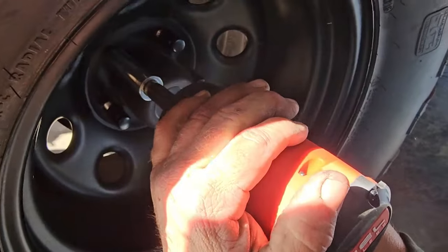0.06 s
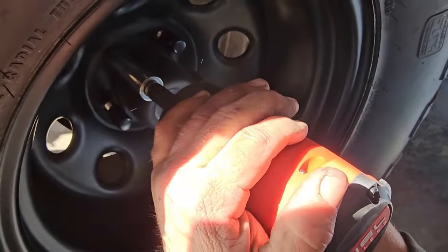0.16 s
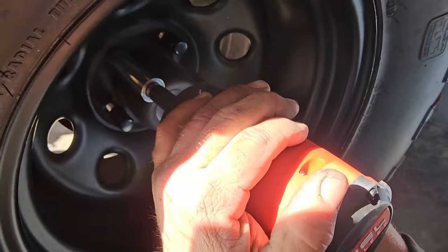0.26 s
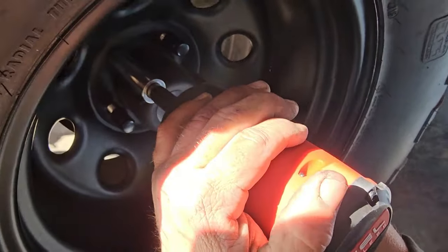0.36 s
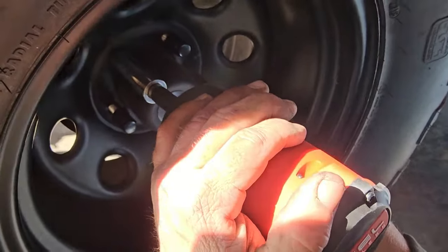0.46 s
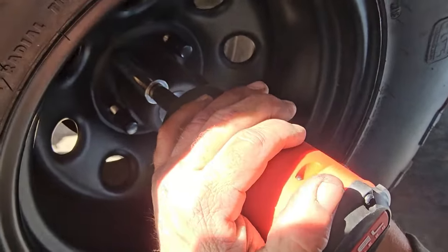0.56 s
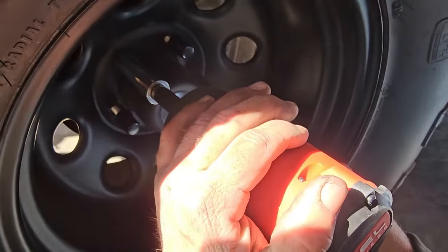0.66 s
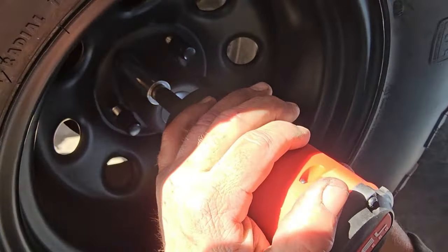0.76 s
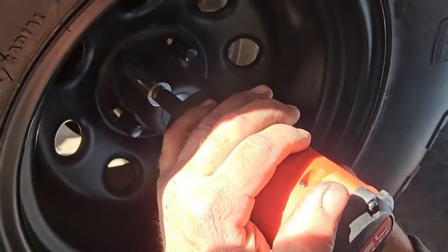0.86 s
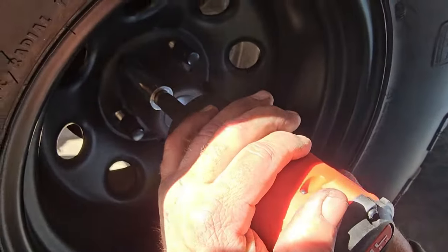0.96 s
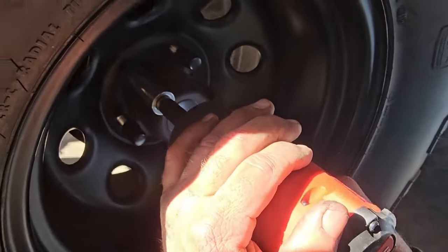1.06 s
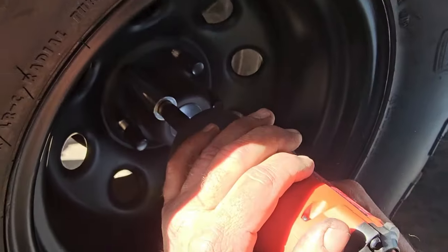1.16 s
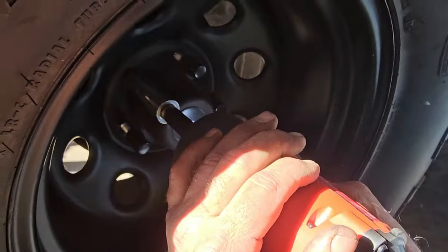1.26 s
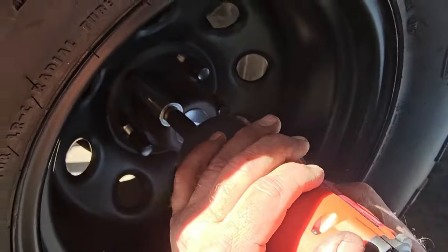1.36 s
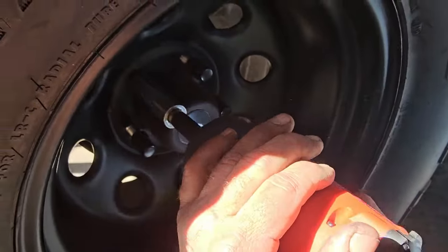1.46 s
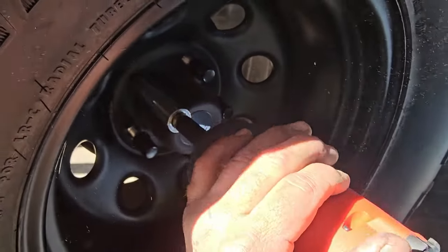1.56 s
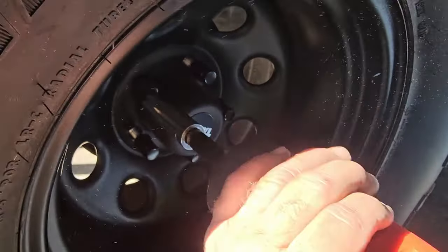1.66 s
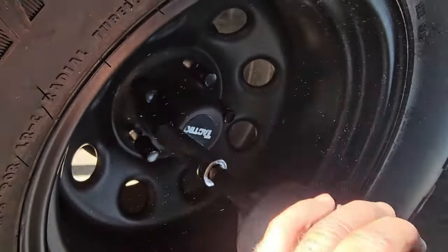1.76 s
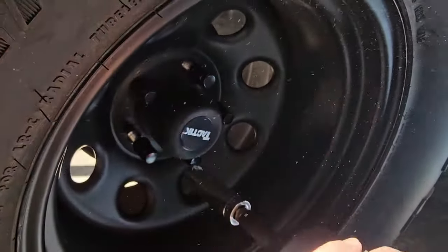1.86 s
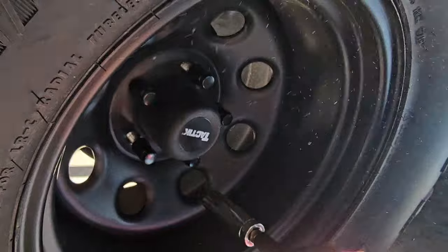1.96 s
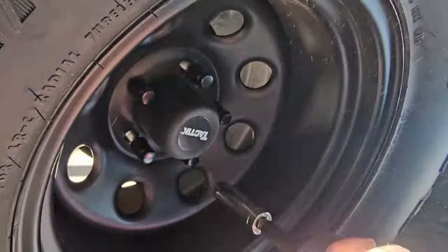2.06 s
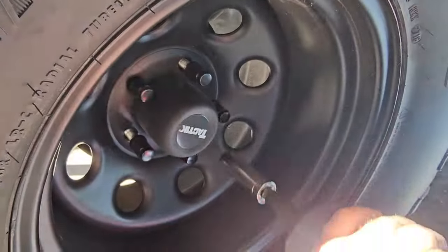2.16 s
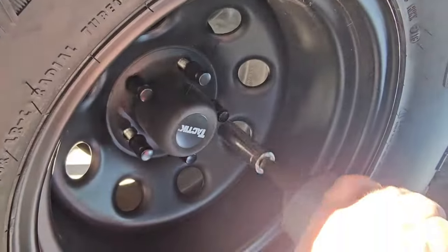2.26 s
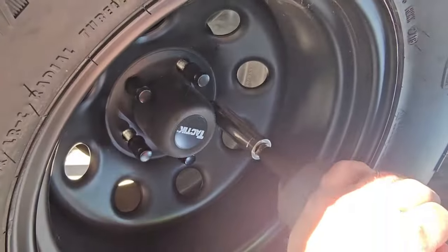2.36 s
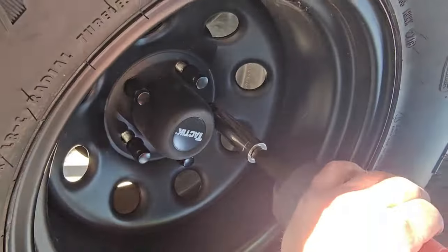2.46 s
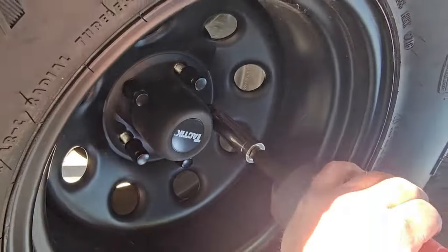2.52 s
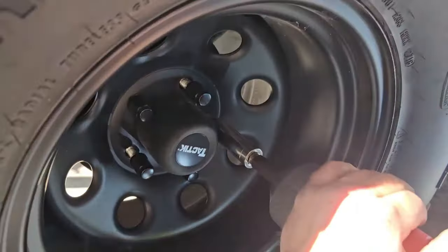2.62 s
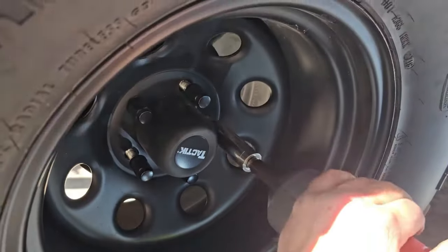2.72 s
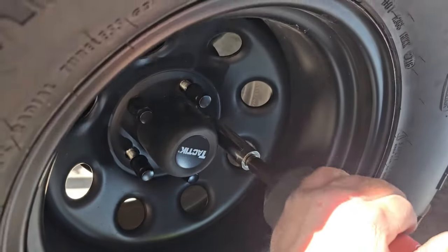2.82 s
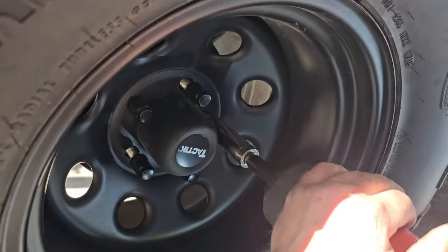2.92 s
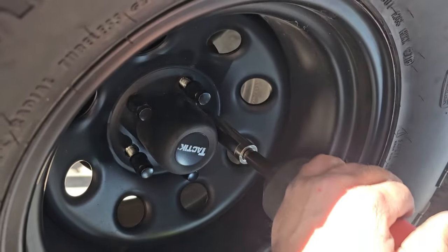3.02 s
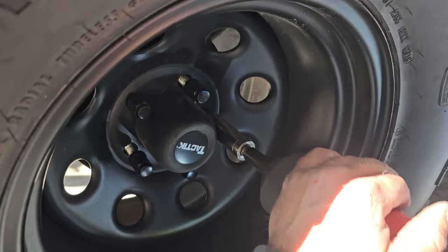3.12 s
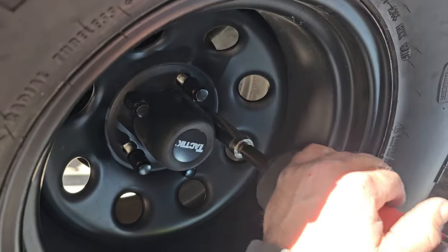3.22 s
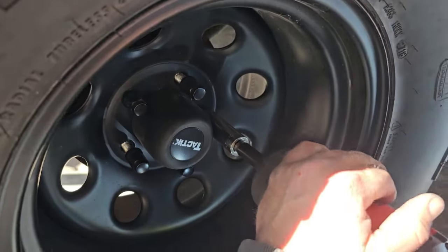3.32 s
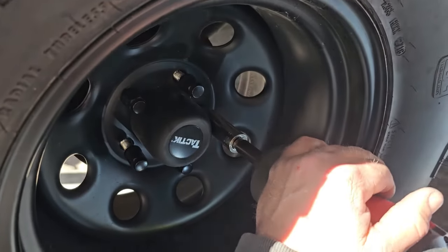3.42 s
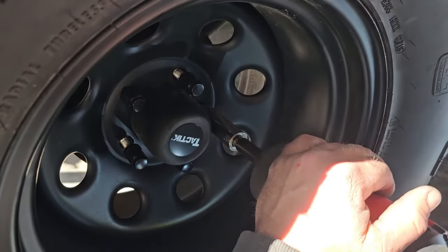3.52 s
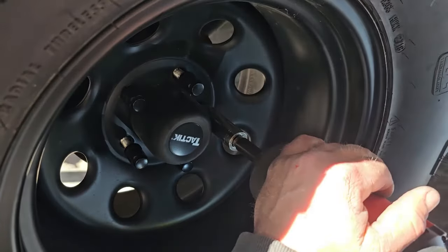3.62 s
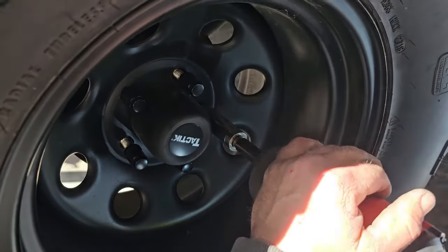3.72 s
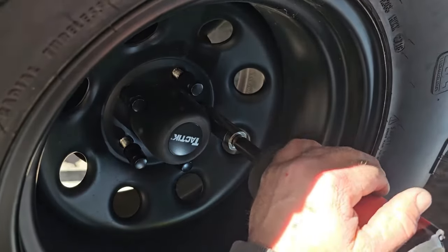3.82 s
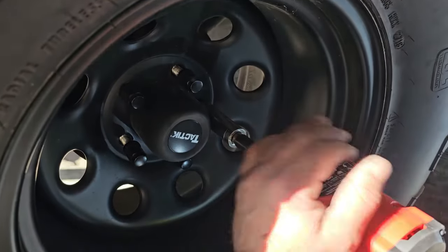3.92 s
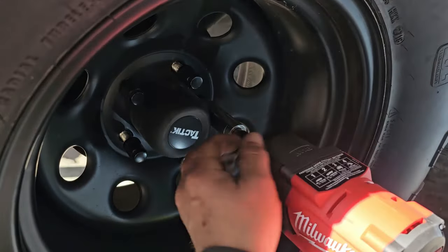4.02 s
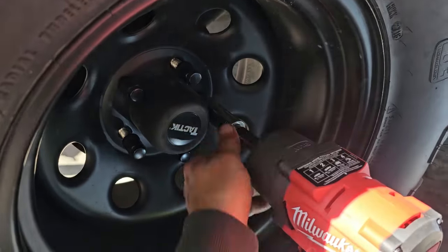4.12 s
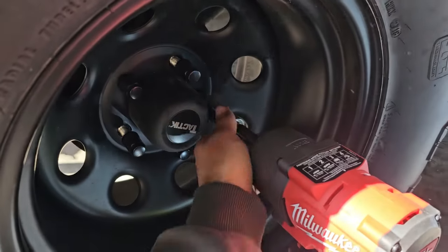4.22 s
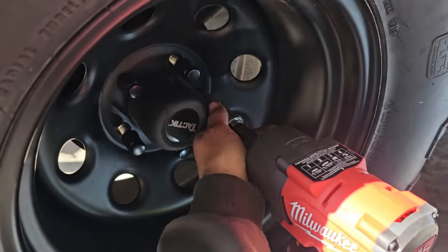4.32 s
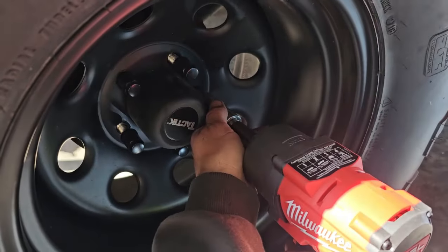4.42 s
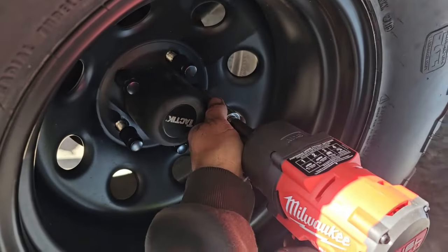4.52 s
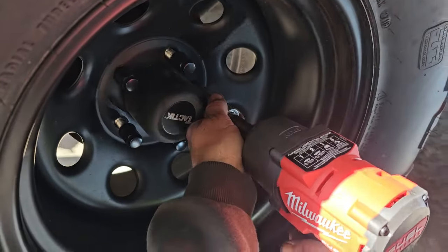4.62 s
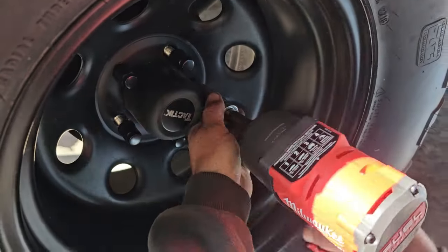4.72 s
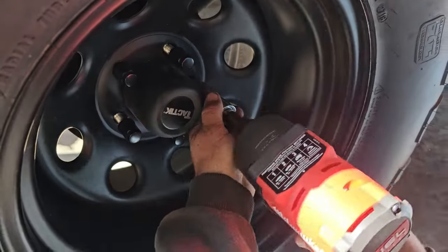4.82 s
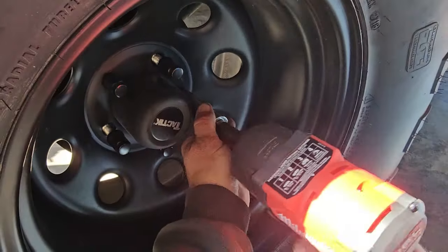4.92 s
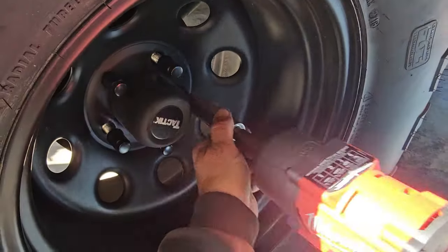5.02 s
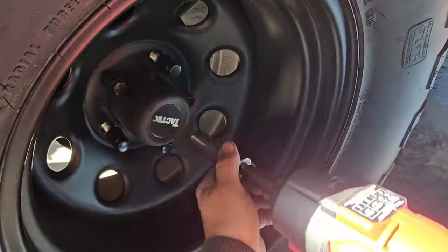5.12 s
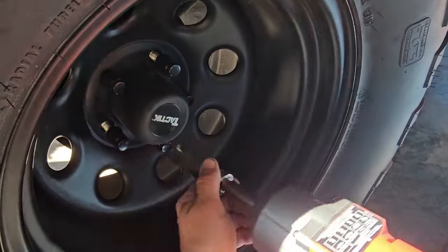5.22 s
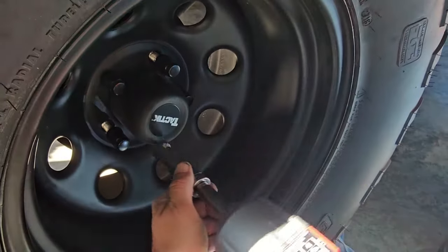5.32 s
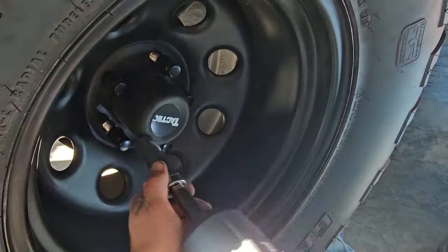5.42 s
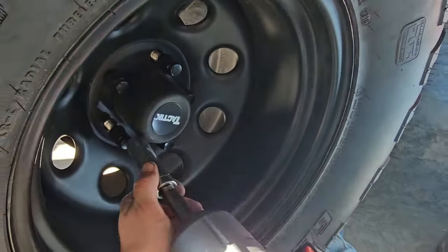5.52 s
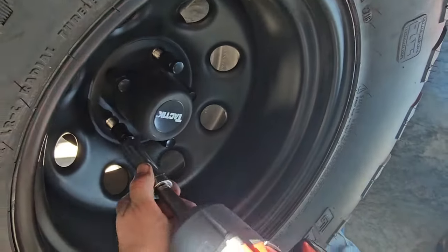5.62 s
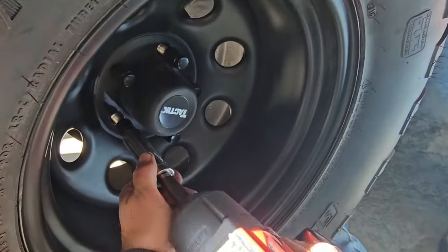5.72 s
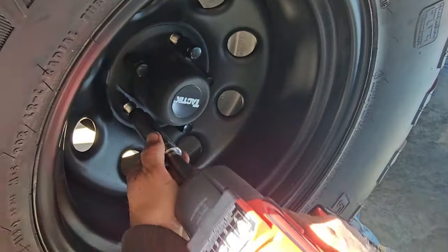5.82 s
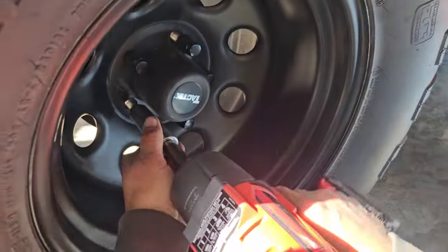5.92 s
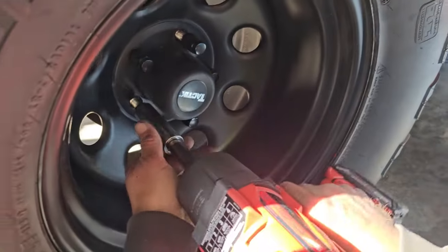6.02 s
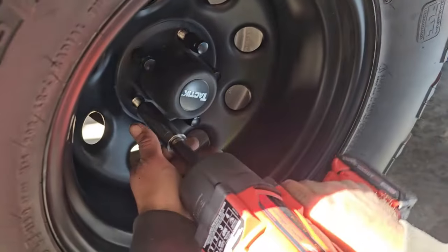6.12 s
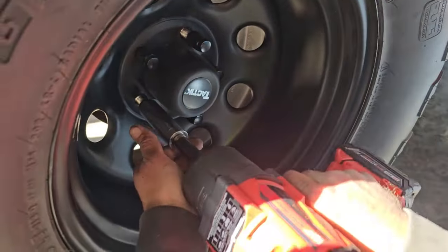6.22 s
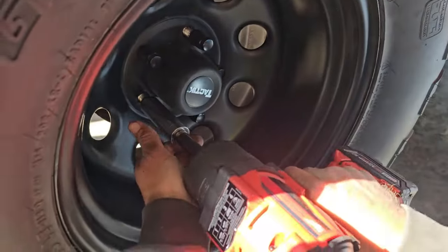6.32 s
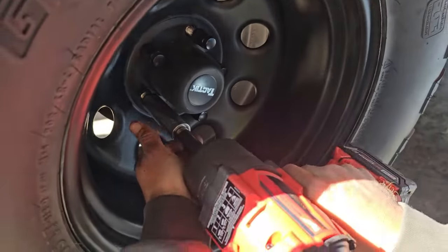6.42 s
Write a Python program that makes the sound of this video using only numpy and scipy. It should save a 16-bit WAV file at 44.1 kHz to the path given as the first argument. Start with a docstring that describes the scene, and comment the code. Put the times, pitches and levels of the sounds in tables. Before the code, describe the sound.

A cordless impact wrench whines, then hammers a wheel nut tight in rapid metallic cracks; socket knocks and more short bursts follow outdoors.

```python
"""A motor whine over gritty gear chatter comes first: an impact wrench, close by, running lug nuts onto a wheel.
The whine, gear tones and drive switching are sines tied to one motor speed; the chatter is banded noise.
Paired hammer blows crack and clang as nuts seat; light ticks sound while the motor spins and as it coasts down.
Between pulls the socket knocks on nut and wheel and sings as beating sines; contacts are noise and wheel modes.
Behind lie scattered yard returns, low outdoor rumble and faint hiss, all made of noise."""
import sys
import numpy as np
from scipy import signal
from scipy.io import wavfile
from scipy.ndimage import uniform_filter1d

SR = 44100
rng = np.random.default_rng(int(sys.argv[2]) if len(sys.argv) > 2 else 0)


def file_out(sig):
    """Save sig as 16-bit WAV at sys.argv[1]."""
    # one column per channel
    cols = np.atleast_2d(sig).T
    # limit, then scale
    lim = np.clip(cols, -1, 1)
    pcm = np.round(lim * 32767).astype(np.int16)
    wavfile.write(sys.argv[1], SR, pcm)


N = 285327

# Motor from trigger to rest, one table a pull: t/s, whine f/Hz, whine level/dB
MOTOR_SPEEDS = [
    [(0, 3665, -36), (.1, 3310, -30), (.5, 3250, -30), (.85, 3045, -31), (1.0, 2980, -23),
     (1.19, 2858, -20), (1.225, 2800, -24), (1.26, 2510, -30), (1.43, 2400, -30), (1.5, 1000, -30),
     (1.66, 500, -30)],
    [(2.8, 390, -70), (2.86, 2100, -45), (2.9, 3150, -27), (2.95, 4000, -22), (3.0, 4240, -22),
     (3.09, 4348, -20), (3.21, 4333, -22), (3.275, 3970, -24), (3.31, 3295, -34), (3.4, 2800, -34),
     (3.48, 1500, -34), (3.63, 600, -34)],
    [(3.645, 294, -70), (3.68, 2170, -55), (3.89, 3000, -55), (3.92, 1500, -55)],
    [(6.135, 400, -70), (6.17, 1900, -50), (6.2, 2550, -28), (6.24, 3250, -22), (6.28, 3950, -25),
     (6.33, 4230, -25), (6.4, 4320, -25), (6.47, 4300, -26)],
]
# One row a pull: nut seats t/s, gear noise level/dB, mid left-right/dB, treble left-right/dB,
# extra brightness/dB, nose-cone level/dB, rumble level/dB, gear-tone level/dB, switching level/dB,
# starting wobble/%. Source levels are those at full speed.
PULLS = [(1.235, -18.5, -1.5, 9, -4, -28.5, -37.5, -29, -29, 3.5),
         (3.3, -21, -4, 8, 0, -32, -33, -65, -70, 0),
         (3.68, -23, -1.5, 8.3, -5, -35.5, -37.5, -65, -54.5, 1.5),
         (6.47, -18.5, -3.5, 7.6, -13, -23, -34, -53, -69, .5)]
# Whine and its overtones: multiple of the whine, level/dB
WHINE_TONES = [(1, 0), (2, -10), (3, -18)]
# Gear tones: sevenths of the whine, level/dB
GEAR_TONES = [(1, -7), (2, -6), (3, -10), (4, 1), (5, 4), (6, -1), (8, -7), (9, -8), (10, -6)]
# Drive switching: multiple of the switching rate, eighths of the whine added, level/dB
SWITCHING_TONES = [(1, -2, -25), (1, -1, 6), (1, 0, -4.5), (1, 1, 0.5), (1, 2, -28), (2, -1, -9.5),
                   (2, 0, -18.5)]
SWITCH_HZ, FULL_SPEED_HZ = 7728, 4350   # full speed is given as whine frequency
DB_PER_OCTAVE = 7.5   # the tool gets louder with speed
OVERTONE_LOSS_DB = 55   # times the shortfall from full speed, as a fraction
NUT_TURN_S, FASTEST_S = .1095, .135   # one turn of the nut; a moment of least drag
TONES_FADE_S = .02   # hammering breaks up the tones once the nut seats
START_SWITCH_DB, START_FALL_DB_PER_S = -58, 60   # extra switching as the motor starts
# binding eases as the nut runs down, and shakes the tool (dB per % of wobble)
WOBBLE_RISE_S, WOBBLE_FADE_S, RUMBLE_DB_PER_WOBBLE = .1, .8, 3.5

# Gear noise colour: f/Hz, level/dB per Hz
GEAR_COLOUR = [(290, -43), (500, -14), (919, -12.5), (1160, -17), (1300, -13.5), (1510, -8), (2190, -4.5),
               (3700, -7), (4340, 3.5), (5630, -12.5), (7530, -14.5), (9090, -16), (14000, -25),
               (15100, -34), (16000, -28.5)]
# Housing resonances: f/Hz, width/Hz, level/dB against the gear noise
HOUSING = [(2260, 60, -14), (4740, 320, -6.5), (5320, 41, -15), (7060, 330, -7.5)]
# Nose-cone resonance: f/Hz, width/Hz
NOSE_CONE = (3040, 130)
NOSE_FOLLOWS = 0.48   # exponent: how far the nose cone follows loudness before the nut seats

# Hammer pairs: dull blow t/s, dull peak level/dB, gap/ms, bright peak level/dB
HAMMER_PAIRS = [(1.2373, -8, 10, -17), (1.2479, -8, 9.2, -7), (1.2597, -31, 11.7, -9.5),
                (1.299, -10, 6.7, -7), (1.3047, -12, 10.8, -8), (1.3419, -8, 8.8, -6),
                (1.3782, -6, 12.4, -10.5), (1.4142, -4.5, 9.8, -7.5), (1.463, -21, 16, -8),
                (3.302, -28, 8.7, -7.5), (3.3444, -19, 8.9, -7.5), (3.3875, -16, 7.6, -5.5),
                (3.4463, -27, 16.5, -14), (3.666, -44.5, 11.1, -14.5), (3.7021, -17.5, 20.4, -7.5),
                (3.7516, -8.5, 11.6, -7.5), (3.79, -10, 9.5, -7.5), (3.827, -11.5, 10.2, -8.5),
                (3.865, -12, 11.6, -8), (3.887, -37, 10, -13.5), (6.164, -41, 10, -8.5)]
# Tick runs: first t/s, last t/s, first gap/ms, gap growth/ms, first peak level/dB, loss a tick/dB
TICK_RUNS = [(0.2854, .29, 22, 0, -5.5, -0.5), (1.512, 1.64, 23.5, 0.98, -11, 2),
             (2.828, 2.83, 24, 0, -13.5, 0), (3.0176, 3.24, 37, 0.03, -12, -0.5),
             (3.4835, 3.63, 20.5, .8, -18.5, 0.46), (6.352, 6.45, 40, 0.37, -11.5, 12)]
# Socket knocks, and one late tick at 1.6628 s: t/s, mid, thump and treble peak level/dB, low clang level/dB
LATE_TICK_AND_KNOCKS = [(1.6628, -34, -68, -46, -51), (1.704, -29.5, -81, -35, -48),
                        (1.7294, -40.5, -60, -53, -59), (2.3631, -14, -25, -20.5, -16),
                        (2.4058, -38, -41, -31, -61), (2.425, -30, -48, -22.5, -44),
                        (2.4353, -25.5, -62, -25.5, -31), (2.4742, -25, -29, -28, -27.5),
                        (2.608, -46.5, -61, -58, -58), (2.6376, -38, -38, -36, -54),
                        (2.6723, -7.5, -13.5, -12.5, -14), (2.815, -28, -66, -38, -38),
                        (4.7528, -64, -41.5, -59, -68), (4.7767, -40.5, -42.5, -41, -54),
                        (4.7964, -35, -44, -25.5, -55), (4.8297, -35, -47, -34, -54),
                        (4.918, -42, -45, -47, -67), (4.9568, -26.5, -34, -33.5, -55),
                        (4.9927, -30.5, -71, -34, -59), (5.027, -24.5, -59, -21, -55),
                        (5.0374, -21, -55, -14, -51), (5.0626, -41, -52, -31, -61),
                        (5.463, -40, -58, -53, -60), (5.5113, -14.5, -25.5, -37, -27.5),
                        (5.6976, -65.5, -40.5, -68.5, -71), (5.8234, -28, -64.5, -31.5, -58),
                        (5.8565, -18.5, -39, -24, -30), (5.8794, -28, -59, -31, -52),
                        (5.945, -11, -22, -18, -23.5), (6.1234, -51.5, -61, -53.5, -63),
                        (6.1431, -33, -62, -33, -45)]
# Contact colour against its peak: mid level/dB, thump level/dB, treble level/dB, left-right/dB
DULL, BRIGHT, TICK = (0, -16, -6, -7), (0, -17.5, -1, -2), (1.5, -22, -4.5, -1.5)
PAN_SPREAD_DB, KNOCK_PAN_DB, HIGH_CLANG_DB = 2, -2.5, 1.5
TREBLE_LEFT_DB = 8.5   # added left lean at the top of each contact
HARD_RISE_MS, SOFT_RISE_MS = .8, 2.0   # blows and tick runs; knocks and the late tick
# Cracks of hammer blows, of tick runs, and of knocks with the late tick:
# f/Hz, level/dB against the peak, t60/s
BLOW_CRACK = [(60.25, -12, 0.15), (266, -7, 0.062), (500, -10, 0.062), (940, -15.5, 0.023),
              (2733, -8, 0.038), (6450, -4, 0.033), (14400, -15, 0.035)]
TICK_CRACK = [(60, -27, 0.084), (250.7, -9, .07), (960, -18.5, 0.024), (2800, -7, 0.0045),
              (6460, -2.5, 0.0073), (15000, -21.5, 0.018)]
KNOCK_CRACK = [(60, -25, 0.18), (231, -10.5, 0.19), (998, -18.5, 0.051), (2930, -10.5, 0.049),
               (5570, -4.5, 0.028), (10850, -17, 0.021), (16000, -37, 0.023)]

# Wheel modes: f/Hz, level/dB under the hammer, level/dB under a knock or the late tick, t60/s
WHEEL_MODES = [(188, -17.5, -10, .25), (230, -19, -7, 0.05), (456.8, -4, -17, 0.12), (630, -21, -24, .25),
               (807, -27.5, -19.5, 0.074), (1920, -20.5, -15, 0.073), (2005, -28.5, -1.5, 0.071),
               (3210, -6.5, -13, 0.013), (4200, -21.5, -10.5, 0.064), (4570, -14, -12, 0.043),
               (5120, -55.5, -54, 1), (6520, -13.5, -19, 0.037), (7480, -6.5, -14.5, 0.042)]
# Socket modes, a close pair that beats: f/Hz, level/dB, t60/s
SOCKET_MODES = [(10330, 0, 1.0), (10340, -3, .9)]
# Socket rings: t/s, level/dB, damped at t/s
SOCKET_RINGS = [(1.704, -50, 2.3), (2.362, -42, 2.43), (5.055, -59, 5.37), (5.53, -66, 5.7)]
# Rim mode left ringing: t/s, f/Hz, level/dB, t60/s
RIM_RING = (3.9, 3031, -65, 2.5)

# Surroundings over time: t/s, low rumble level/dB, deep buffet level/dB, hiss level/dB
OUTDOORS = [(0, -41, -42.5, -64), (.14, -39, -27, -74), (.8, -64, -44, -65), (1.3, -48, -37, -36),
            (1.6, -46, -50, -56), (1.8, -59, -52.5, -68), (2.33, -67, -61, -67), (2.52, -49, -48.5, -59.5),
            (3.1, -65, -49, -40), (3.37, -38, -39, -35.5), (3.6, -47, -57, -56), (3.93, -43, -37.5, -46),
            (4.05, -57, -43, -55), (4.25, -58.5, -56, -66), (4.7, -68.5, -61.5, -74.5),
            (4.95, -57, -53, -62), (5.05, -62, -56.5, -52.5), (5.3, -63.5, -56.5, -69),
            (6.0, -58, -51, -62.5), (6.47, -72, -45, -33)]
# Rumble colour: f/Hz, level/dB per Hz
RUMBLE_COLOUR = [(15, -43), (25, -9), (70, 1), (156, -0.5), (213, 2), (325, -12), (452, -12), (786, -22),
                 (900, -11), (1170, -41), (1980, -120)]
# Hiss colour: f/Hz, level/dB per Hz
AIR_COLOUR = [(290, -37), (500, -8), (851, -22), (1410, -11), (1970, -19), (3130, -12), (5850, -22.5),
              (10600, -30), (12000, -34), (15600, -59.5), (22000, -120)]
YARD_T60_S, YARD_DB = 0.24, -21.5
# Stereo noise: f/Hz, left-right likeness (1 same, 0 unrelated, -1 opposite; clipped to that range)
LIKENESS = [(60, 0.86), (180, 1), (550, 0.6), (1650, -0.16), (4970, -0.028), (15000, -1.1)]
ADDED_TOP_LEFT_DB, CUTOFF_HZ = 2.5, 16900


def motor(blur=.004, flutter_db=3.0):
    """Sines for whine, gear tones and switching sidebands, all tied to the motor speed."""
    out, t = np.zeros((2, N)), np.arange(N) / SR
    every = controls()
    angle = 2 * np.pi * ((t - FASTEST_S) / NUT_TURN_S + 1 / 6)
    ease = np.sin(angle) + np.sin(2 * angle) / 2   # once a turn the nut binds slowly and lets go fast
    for speeds, pull in zip(MOTOR_SPEEDS, PULLS):
        seats_s, _, mid_pan, treble_pan, _, _, _, gear_db, switch_db, _ = pull
        on = slice(int(speeds[0][0] * SR), int((seats_s + TONES_FADE_S) * SR))
        hz, since, wobble, loud = [c[on] for c in every[:4]]
        fade = np.clip((seats_s - t[on]) / TONES_FADE_S + 1, 0, 1)

        speed = hz * (1 + wobble / 100 * (ease[on] + 0.26 * drift(27)[on]))
        blurred = speed * (1 + blur * wobble * drift(60)[on])   # uneven load blurs the tones
        clean_phase = 2 * np.pi * np.cumsum(speed) / SR
        blurred_phase = 2 * np.pi * np.cumsum(blurred) / SR
        switch_phase = 2 * np.pi * SWITCH_HZ * t[on]

        # overtones fade as the motor is held below full speed
        held_db = OVERTONE_LOSS_DB * (hz / FULL_SPEED_HZ - 1)
        whine = from_db(in_time(speeds)[1][on])
        gear = loud * from_db(gear_db)
        start = np.minimum(since / TONES_FADE_S, 1) * from_db(START_SWITCH_DB - START_FALL_DB_PER_S * since)
        switching = loud * from_db(switch_db) + start

        tones = []
        for k, db in WHINE_TONES:
            tones.append((k * blurred_phase, whine * from_db(db + (k > 1) * held_db), mid_pan))
        for k, db in GEAR_TONES:
            tones.append((k / 7 * blurred_phase, gear * from_db(db), mid_pan))
        for m, k, db in SWITCHING_TONES:
            tones.append((m * switch_phase + k / 8 * clean_phase, switching * from_db(db), treble_pan))
        for phase, gain, pan in tones:
            lag = rng.uniform(-.7, .7) * np.array([[1], [-1]])   # opposite phase shift left and right
            flutter = from_db(flutter_db * drift(10)[on])
            out[:, on] += fade * gain * flutter * sides(pan)[:, None] * np.sin(phase + lag)
    return out


def gear_chatter(patchy_db=2.5, grit_db=1.5):
    """Coloured gear noise with narrow housing and nose-cone resonances, louder with speed."""
    *_, loud, row = controls()
    seats_s, gear_db, mid_pan, treble_pan, bright_db, nose_db = row[:6]
    gears = 0
    for hz, width, band in bands(stereo_white()):
        if hz <= 500:
            continue
        treble = np.clip(np.log2(hz / 2500) / 2, 0, 1)
        pan = (mid_pan + treble * (treble_pan - mid_pan)) * np.clip(np.log2(hz / 500) / 2, 0, 1)
        level_db = at_hz(GEAR_COLOUR, hz) + treble ** 2 * bright_db + patchy_db * drift(45)
        gears = gears + from_db(level_db) * sides(pan) * band
    gears = rms_one(gears)
    for hz, width, level_db in HOUSING:
        gears += from_db(level_db + 2.2 * drift(34)) * sides(mid_pan) * resonance(hz, width)
    nose = from_db(nose_db) * sides(mid_pan) * resonance(*NOSE_CONE)
    nose_loud = loud ** np.where(np.arange(N) / SR < seats_s, NOSE_FOLLOWS, 1)
    grit = from_db(grit_db * drift(130))   # tooth contacts make the noise uneven
    return grit * (loud * from_db(gear_db) * rms_one(gears) + nose_loud * nose)


def controls():
    """Whine Hz, seconds since the trigger, wobble %, loudness from speed and pull row, by sample."""
    t = np.arange(N) / SR
    starts = np.array([speeds[0][0] for speeds in MOTOR_SPEEDS])
    stops = np.array([speeds[-1][0] for speeds in MOTOR_SPEEDS])
    pull = np.maximum(np.searchsorted(starts, t, side="right") - 1, 0)
    hz, _ = in_time([row for speeds in MOTOR_SPEEDS for row in speeds])
    since, row = t - starts[pull], np.array(PULLS)[pull].T
    turning = uniform_filter1d(1.0 * (t <= stops[pull]), size=600)
    wobble = row[9] * np.clip(since / WOBBLE_RISE_S, 0, 1) * np.exp(-since / WOBBLE_FADE_S)
    loud = turning * from_db(DB_PER_OCTAVE * np.log2(hz / FULL_SPEED_HZ))
    return hz, since, wobble, loud, row


def hammer_blows():
    """The hammer strikes the anvil in pairs, a dull blow and then a bright one."""
    s, dull_db, gap_ms, bright_db = np.transpose(HAMMER_PAIRS)
    return np.vstack([struck(s, dull_db, DULL), struck(s + gap_ms / 1000, bright_db, BRIGHT)])


def hammer_ticks():
    """Light ticks from the turning hammer; each run changes gap and level by its own steps."""
    k, rows = np.arange(12), []
    for first, last, gap_ms, grow_ms, peak_db, loss_db in TICK_RUNS:
        s = first + (gap_ms * k + grow_ms * k * (k - 1) / 2) / 1000
        rows.append(struck(s, peak_db - loss_db * k, TICK)[s <= last])
    return np.vstack(rows)


def late_tick_and_knocks():
    """A last coasting tick, then socket on nut and wheel: struck() columns, low and high clang dB."""
    s, mid, thump, treble, low_clang = np.transpose(LATE_TICK_AND_KNOCKS)
    high_clang = np.minimum(mid, treble) + HIGH_CLANG_DB
    return np.transpose([s, mid, thump, treble, KNOCK_PAN_DB + 0 * s, low_clang, high_clang])


def struck(s, peak_db, colour):
    """Rows of (s, mid, thump, treble peak dB, left-right dB) for one kind of contact."""
    mid, thump, treble, pan = colour
    pans = pan + PAN_SPREAD_DB * rng.standard_normal(len(s))
    return np.transpose([s, peak_db + mid, peak_db + thump, peak_db + treble, pans])


def cracks(blows, ticks, soft):
    """Each contact is a burst of noise that swells briefly and dies band by band."""
    out = 0
    kinds = ((blows, BLOW_CRACK, HARD_RISE_MS), (ticks, TICK_CRACK, HARD_RISE_MS),
             (soft, KNOCK_CRACK, SOFT_RISE_MS))
    for hz, width, band in bands(stereo_white()):
        lean = np.clip(np.log2(hz / 250) / 2, 0, 1)
        treble_lean_db = TREBLE_LEFT_DB * np.clip(np.log2(hz / 3000) / 2, 0, 1)
        power = 0
        for rows, crack, rise_ms in kinds:
            peak_db = [at_hz([(250, thump), (2200, mid), (8000, treble)], hz)
                       for s, mid, thump, treble in rows[:, :4]]
            level = from_db(peak_db + at_hz(crack, hz) + rng.normal(0, 2.5, len(rows)))
            pan = sides(rows[:, 4] * lean + treble_lean_db)
            smooth = np.exp(-1000 / (rise_ms * SR))
            fall = from_db(-120 / (at_hz(crack, hz, column=2) * SR))   # squared gain: 60 dB in one t60
            hits = clicks(rows, (level * pan) ** 2)
            swell = signal.lfilter([(1 - smooth) ** 2], [1, -2 * smooth, smooth ** 2], hits)
            power = power + signal.lfilter([1], [1, -fall], swell)
        out = out + np.sqrt(power * SR / 2 / width) * band
    return out


def wheel(blows, ticks, soft, tick_db=-7.0, swell_t60_s=0.0025):
    """Every contact rings the wheel's modes; taking away a fast-dying ring makes each build up."""
    out = 0
    for hz, blow_db, knock_db, t60 in WHEEL_MODES:
        strikes = 0
        for rows, level_db in ((blows, blow_db), (ticks, blow_db + tick_db), (soft, knock_db)):
            has_clang = rows.shape[1] > 5   # only knocks and the late tick carry clang columns
            if has_clang and 1800 < hz < 2200:
                column = 5   # low clang
            elif has_clang and 4000 < hz < 5000:
                column = 6   # high clang
            elif hz < 700:
                column = 2   # thump
            else:
                column = 1 if hz < 5000 else 3   # mid, treble
            strength = from_db(rows[:, column] + level_db + rng.normal(0, 0.69, len(rows)))
            strikes = strikes + clicks(rows, strength * sides(rows[:, 4]))
        out = out + ring(strikes, hz, t60) - ring(strikes, hz, swell_t60_s)
    return out


def socket(pan_db=-3.0):
    """The free socket sings as two close decaying sines until it is damped."""
    out, t = 0, np.arange(N) / SR
    for s, level_db, end in SOCKET_RINGS:
        since = np.maximum(t - s, 0)
        free = np.clip(since / .006, 0, 1) * np.clip((end - t) / .04, 0, 1)
        for hz, mode_db, t60 in SOCKET_MODES:
            gain = from_db(level_db + mode_db - 60 * since / t60)
            out = out + free * gain * np.sin(2 * np.pi * hz * since)
    return out * sides(pan_db)[:, None]


def rim():
    """One lightly damped rim mode lingers after the third pull."""
    s, hz, level_db, t60 = RIM_RING
    return ring(clicks(np.array([[s]]), from_db([level_db])), hz, t60)


def yard(x):
    """Scattered returns from vehicle, ground and walls: decaying noise, duller than the direct sound."""
    t = np.arange(SR // 2) / SR
    tail = rng.standard_normal((2, len(t))) * from_db(-60 * t / YARD_T60_S) * (t > .006)
    tail = signal.lfilter([.5], [1, -.5], tail)
    tail = tail / np.sqrt(np.sum(tail ** 2) / 2)
    return from_db(YARD_DB) * signal.fftconvolve(x, tail, axes=1)[:, :N]


def outdoors(gust_db=1.0, air_db=1.5, deep_pan_db=2.5):
    """Low rumble through tool, tyre and wind, and a faint hiss of the yard, as drifting noise bands."""
    rumble_db, deep_db, hiss_db = in_time(OUTDOORS)
    _, _, wobble, loud, row = controls()
    shaking = loud * from_db(row[6] + RUMBLE_DB_PER_WOBBLE * wobble)
    deep, rumble, air, gust = 0, 0, 0, drift(7)
    for hz, width, band in bands(stereo_white()):
        low = from_db(at_hz(RUMBLE_COLOUR, hz) + gust_db * (gust + drift(3.6))) * band
        deep = deep + low * (hz < 110)
        rumble = rumble + low * (110 < hz < 900)
        air = air + from_db(at_hz(AIR_COLOUR, hz) + air_db * drift(1.7)) * band
    deep = from_db(deep_db) * sides(deep_pan_db)[:, None] * rms_one(deep)
    rumble = (from_db(rumble_db) + shaking) * rms_one(rumble)
    return deep + rumble + from_db(hiss_db) * rms_one(air)


def from_db(db):
    """Gain of a level."""
    return 10 ** (np.asarray(db) / 20)


def rms_one(x):
    """Scaled to rms 1."""
    return x / np.sqrt(np.mean(x ** 2) + 1e-20)


def in_time(rows):
    """Columns of a table, sample by sample."""
    s, *columns = np.transpose(rows)
    return [np.interp(np.arange(N) / SR, s, c) for c in columns]


def at_hz(points, hz, column=1):
    """A table read on a log-frequency axis."""
    points = np.array(points)
    return np.interp(np.log(hz), np.log(points[:, 0]), points[:, column])


def drift(rate):
    """Slow chance of rms 1: noise low-passed at about rate Hz, made at every 40th sample."""
    r = np.exp(-80 * np.pi * rate / SR)
    white = rng.standard_normal(N // 40 + 2002)
    slow = signal.lfilter([1], [1, -2 * r, r * r], white)[2000:]   # skip the filter's settling
    return np.interp(np.arange(N) / 40, np.arange(len(slow)), rms_one(slow))


def sides(pan_db):
    """Left and right gains; positive leans left."""
    return from_db(np.array([pan_db / 2, -pan_db / 2]))


def clicks(rows, gains):
    """An impulse 1 ms ahead of the time of each row; gains may be per channel."""
    out = np.full(np.shape(gains)[:-1] + (N,), 1e-18)
    out[..., ((rows[:, 0] - .001) * SR).astype(int)] = gains
    return out


def ring(x, hz, t60):
    """A damped resonator: a unit click sets a sine of starting height 1 ringing."""
    r, w = from_db(-60 / (t60 * SR)), 2 * np.pi * hz / SR
    return signal.lfilter([0, np.sin(w)], [1, -2 * r * np.cos(w), r * r], x)


def resonance(hz, width):
    """Stereo noise through one resonator of the given width in Hz, at rms 1."""
    return rms_one(ring(rng.standard_normal((2, N)), hz, np.log(1000) / (np.pi * width)))


def stereo_white():
    """Two independent pairs of white noise, for alternate bands."""
    return rng.standard_normal((2, 2, N))


def bands(white):
    """Half-octave stereo bands of white noise, each with its likeness: (centre Hz, width Hz, band)."""
    edges = 25 * 2 ** np.arange(0, 9.6, .5)
    for k, (low, high) in enumerate(zip(edges, edges[1:])):
        band_pass = signal.butter(2, [low, high], "band", fs=SR, output="sos")
        mid, side = signal.sosfilt(band_pass, white[k % 2])
        hz = np.sqrt(low * high)
        alike = np.clip(at_hz(LIKENESS, hz), -1, 1)
        stereo = np.sqrt(.5 + alike / 2) * mid + np.sqrt(.5 - alike / 2) * side * [[1], [-1]]
        yield hz, high - low, stereo


def scene():
    """Tool, contacts and their surroundings."""
    hits = hammer_blows(), hammer_ticks(), late_tick_and_knocks()
    contacts = cracks(*hits) + wheel(*hits)
    return motor() + gear_chatter() + contacts + socket() + rim() + yard(contacts) + outdoors()


def record(dry):
    """Treble above 9 kHz is boosted with a left lean, peaks are rounded, the top is cut."""
    top = signal.sosfilt(signal.butter(2, 9000, "high", fs=SR, output="sos"), dry)
    leaning = dry + top * sides(ADDED_TOP_LEFT_DB)[:, None]
    rounded = 1.2 * np.tanh(leaning / 1.2)
    return signal.sosfilt(signal.cheby2(12, 60, CUTOFF_HZ, fs=SR, output="sos"), rounded)


dry = scene()
out = record(dry)
file_out(out)
```